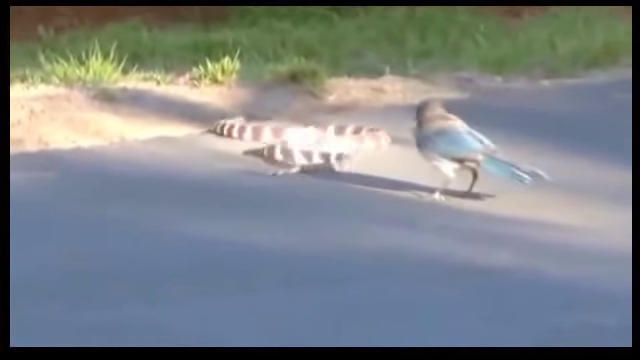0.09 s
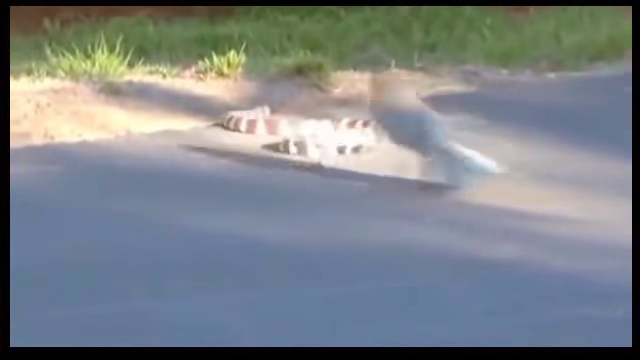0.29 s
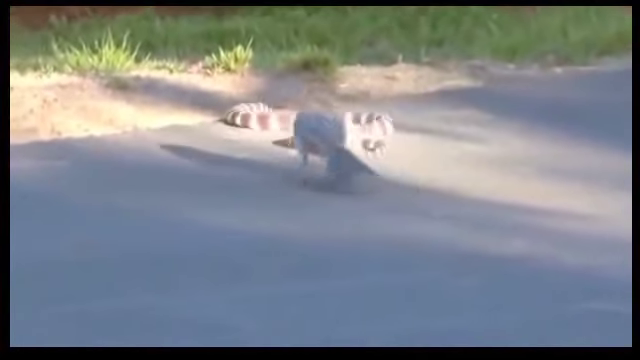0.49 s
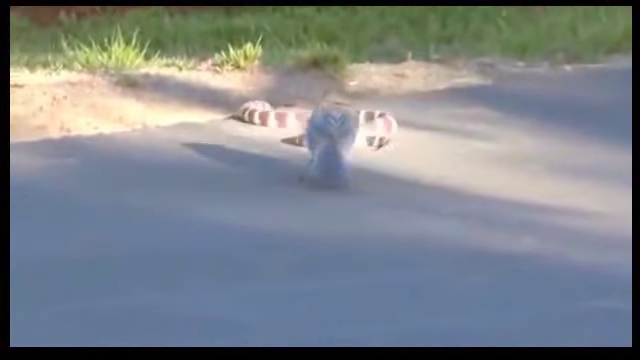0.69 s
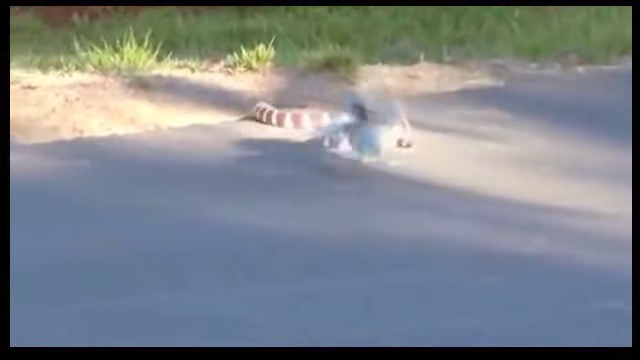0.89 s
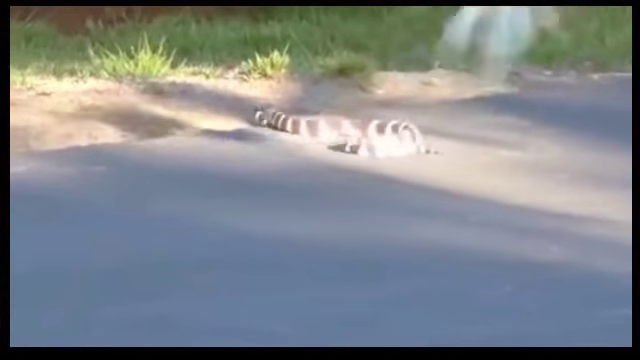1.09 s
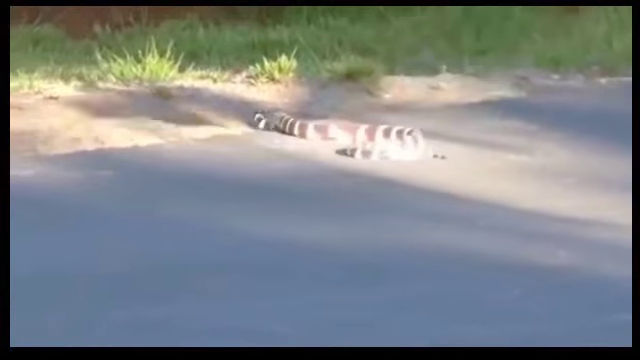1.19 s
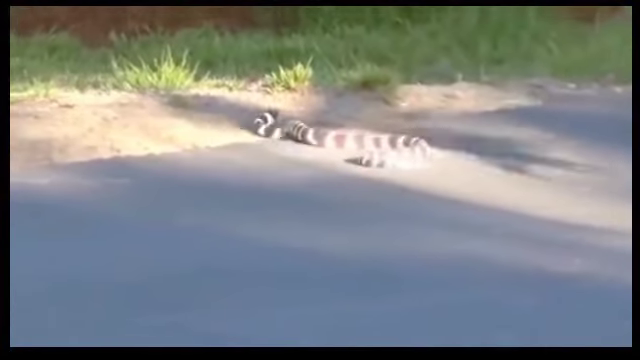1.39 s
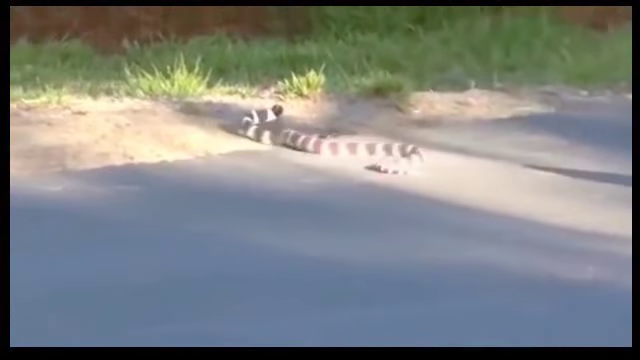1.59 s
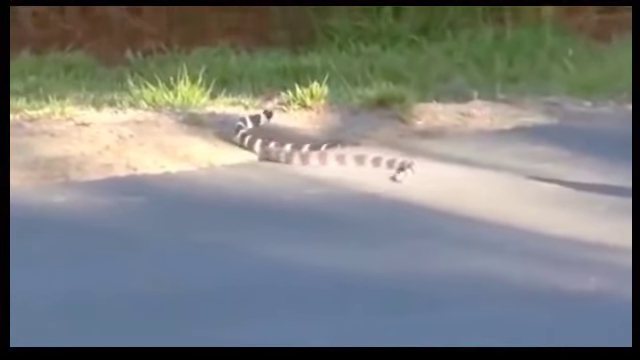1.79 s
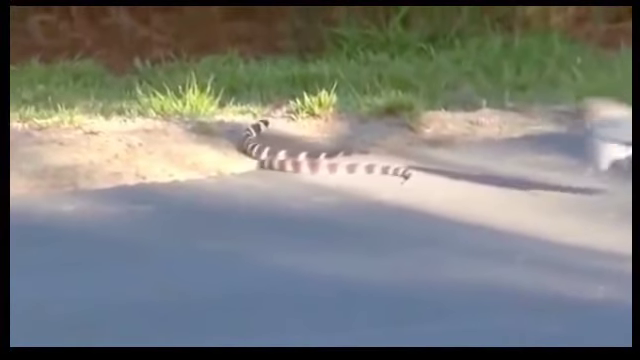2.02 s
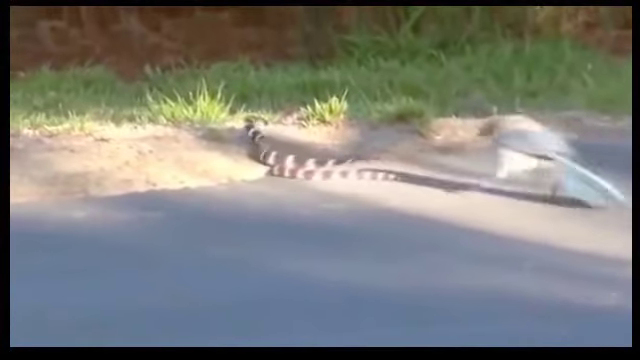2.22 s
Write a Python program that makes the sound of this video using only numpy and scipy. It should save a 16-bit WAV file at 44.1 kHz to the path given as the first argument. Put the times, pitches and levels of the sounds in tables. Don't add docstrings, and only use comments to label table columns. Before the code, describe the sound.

A jay slightly right gives a harsh rising scold near the start and a stronger, shorter one near the end; a sharp loud handling click cuts into the first, over faint roadside hiss on a hand-held camera microphone.

```python
import sys
import numpy as np
from scipy import signal
from scipy.fft import rfft, irfft
from scipy.io import wavfile
from scipy.ndimage import uniform_filter1d

SR = 44100
rng = np.random.default_rng(int(sys.argv[2]) if len(sys.argv) > 2 else 0)


def amplitude_ratio(level_db):
    exponent = np.asarray(level_db, float) / 20
    return 10 ** exponent


def materialize(psi):
    bounded = np.clip(np.atleast_2d(psi).T, -1, 1)
    quanta = np.round(bounded * 32767).astype(np.int16)
    wavfile.write(sys.argv[1], SR, quanta)


N = 99225

# frequency in Hz, level in dB per Hz.
AIR_COLOUR = [(25, -25), (118, -16), (300, -6), (690, 0), (2500, -10), (10000, -23), (11500, -30),
              (14500, -33.5)]
# frequency in Hz, left minus right in dB.
AIR_LEAN = [(60, -17), (110, -12), (200, -10), (380, -6.0), (690, -4.5), (1280, 4), (2350, 5.5), (4330, 5),
            (7990, 3.5), (14700, -16)]
# frequency in Hz, shared power from 0 to 1.
AIR_LIKENESS = [(100, 0.28), (600, 0.13), (3000, 0.48), (7000, .27), (14000, 0.031)]
# middle in seconds, half length in seconds, level in dB.
RUMBLE_SWELLS = [(.01, 0.022, -71), (0.14, 0.07, -61.5), (0.305, 0.036, -65.5), (0.592, 0.07, -63.5),
                 (0.687, 0.039, -60), (0.791, 0.024, -65.5), (1.02, 0.054, -67.5), (1.114, 0.033, -70),
                 (1.673, 0.045, -69), (1.83, .04, -68), (2.05, .04, -77)]
# time in seconds, peak in dB, left minus right in dB, tilt in dB per octave.
BODY_CLICKS = [
    (0.0419, -23, -6, 8.5),
    (0.2243, -4, 2.5, 2),
]
# crack length in seconds, snap delay in seconds, snap level in dB.
CLICK_BREAKS = [
    (.0007, .0022, -3),
    (.0019, .0007, 3),
]
# frequency in Hz, level in dB, 60 dB decay in seconds.
SHELL_MODES = [(1132, 1.5, 0.018), (1767, -4, 0.023), (2097, -4.5, 0.048), (2810, -11, 0.025),
               (3560, -8, 0.011), (4040, 0, 0.0079)]
# frequency in Hz, level in dB.
CRACK_COLOUR = [(500, -14.5), (2000, 8), (4200, 2), (5500, -13), (7000, -6.5), (9500, -21.5),
                (11500, -14.5), (13000, -54)]
# time in seconds, peak in dB, pitch in Hz, cycles, left minus right in dB.
BODY_BUMPS = [(0.097, -52.5, 111, 0.54, -15), (0.123, -57, 100, 0.42, -14), (0.229, -58, 241, 1.6, -14),
              (.667, -43, 265, 0.31, 3), (.6727, -35, 270, .8, -6), (1.014, -57, 210, 1., -6)]
# time in seconds, level in dB, rasp in dB, breath in dB.
CALL_EFFORT = [
    [(.13, -59, -9, -16.5), (.15, -45.5, -7, -13.5), (.19, -40, -5, -7.5), (.25, -41.5, -3, -3.5),
     (.3, -39.5, -16, -7), (.37, -38, -12, -17), (.42, -40.5, -1, -16.5), (.45, -51, -25, -14),
     (.5, -58, -7, -7)],
    [(1.73, -57, -9, -7.5), (1.765, -46, -5, -3.5), (1.83, -40.5, -9, -3), (1.88, -36.5, -19, -5),
     (1.935, -33, -12, -11.5), (1.96, -36.5, -13, -12), (2.0, -40.5, -16, -12), (2.035, -50.5, -12, -14),
     (2.08, -78, -12, -14)],
]
# time in seconds, pitch in Hz, warble as a share of pitch.
CALL_PITCH = [
    [(.13, 420, 0), (.162, 640, 0), (.19, 830, 0), (.215, 930, 0), (.25, 1090, .01), (.3, 1200, .01),
     (.335, 1240, .02), (.355, 1390, .07), (.43, 1460, .035)],
    [(1.73, 420, 0), (1.765, 600, 0), (1.79, 850, 0), (1.812, 910, 0), (1.835, 1060, .01),
     (1.88, 1200, .01), (1.935, 1260, .015), (1.955, 1410, .095), (2.01, 1450, .04)],
]
# frequency in Hz, gain in dB.
THROAT_GAIN = [(1000, -33), (1500, -7), (2300, 3), (2950, -5.5), (3750, 9.5), (4900, -5), (6300, -16),
               (9500, -35)]
# frequency in Hz, level in dB.
BREATH_COLOUR = [(1500, -23.5), (2400, 2), (4000, 0), (5200, -0.5), (7000, -2), (8500, -13), (10000, -41.5),
                 (12500, -30)]
# frequency in Hz, left minus right in dB.
BIRD_LEAN = [(1300, -7), (2350, -6.5), (4300, -4.5), (8000, -4)]
# middle in seconds, half length in seconds, pitch in Hz, level in dB.
WHISTLE_TONES = [
    (.415, 0.048, 3050, -50.5),
    (1.987, 0.033, 3068, -45),
]

TOP_HZ = 14500
MID_HZ = 1250


def along(table, hz):
    table = np.array(table, float)
    return np.interp(np.log(np.maximum(hz, 1)), np.log(table[:, 0]), table[:, 1])


def colour(x, gain):
    return irfft(rfft(x) * gain(np.fft.rfftfreq(N, 1 / SR)), N)


def unit(x):
    return x / np.sqrt(np.mean(x ** 2))


def walk(rate):
    return unit(colour(rng.standard_normal(N), lambda f: np.exp(-(f / rate) ** 2)))


def sides(pan_db):
    return amplitude_ratio(np.array([pan_db / 2, -pan_db / 2]))


def air():
    level_db, swell_db, flicker_db = -57, .4, .9
    common, left, right = rng.standard_normal((3, N))

    def alike(f):
        return np.clip(along(AIR_LIKENESS, f), 0, 1)

    shared = colour(common, lambda f: np.sqrt(alike(f)))
    pair = np.array([shared + colour(own, lambda f: np.sqrt(1 - alike(f))) for own in (left, right)])
    pair = colour(pair, lambda f: amplitude_ratio(along(AIR_COLOUR, f)) * sides(along(AIR_LEAN, f)) * (f > 18))
    swell, out = walk(4.5), 0
    for octave in np.arange(4, 14.6, .5):
        band = colour(pair, lambda f: np.clip(1 - 2 * np.abs(np.log2(f + 1) - octave), 0, 1))
        out = out + band * amplitude_ratio(swell_db * swell + flicker_db * walk(4.1))
    return out * amplitude_ratio(level_db) / np.sqrt(np.mean(out.mean(axis=0) ** 2))


def rumble(t):
    centre_hz, width, pan_db = 82, 0.76, -12.5
    noise = rng.standard_normal((2, N))
    low = colour(noise, lambda f: np.exp(-(np.log((f + 1) / centre_hz) / width) ** 2))
    swell = sum(amplitude_ratio(db) * np.exp(-((t - at) / half) ** 2) for at, half, db in RUMBLE_SWELLS)
    return unit(low) * swell * sides(pan_db)[:, None]


def clicks(t):
    snap_hz, snap_s, rattle_s = 2340, 0.00055, 0.0011
    rattle_db, crack_db, tail_db = -5.5, -5, -23
    tail_t60_s, tail_hz, tilt_pivot_hz = 0.091, 1630, 2800
    out = np.zeros((2, N))
    hz, db, t60 = np.array(SHELL_MODES).T[:, :, None]
    for (at, peak_db, pan_db, tilt_db), (crack_s, late_s, snap_db) in zip(BODY_CLICKS, CLICK_BREAKS):
        since = np.maximum(t - at, 0)
        snap = np.exp(-((t - at - late_s) / snap_s) ** 2) * np.sin(2 * np.pi * snap_hz * (t - at))
        hiss = colour(rng.standard_normal((2, N)), lambda f: 1 / (1 + ((f - tail_hz) / 900) ** 2))

        def crack_gain(f):
            return amplitude_ratio(along(CRACK_COLOUR, f) + tilt_db * np.log2((f + 1) / tilt_pivot_hz))

        crack = unit(colour(rng.standard_normal((2, N)), crack_gain))
        crack = crack * amplitude_ratio(crack_db) * np.exp(-((t - at - crack_s) / crack_s) ** 2)
        rise = 1 - np.exp(-(since / rattle_s) ** 2)
        for ch in range(2):
            turn = rng.uniform(0, 2 * np.pi, hz.shape)
            ring_db = db + tilt_db * np.log2(hz / tilt_pivot_hz) - 60 * since / t60
            ring = amplitude_ratio(ring_db) * np.sin(2 * np.pi * hz * since + turn)
            tail = unit(hiss[ch]) * amplitude_ratio(tail_db - 60 * since / tail_t60_s)
            hit = rise * (amplitude_ratio(rattle_db) * ring.sum(axis=0) + tail + crack[ch])
            hit = hit + amplitude_ratio(snap_db - 17.5 * ch) * snap
            out[ch] += hit * amplitude_ratio(peak_db) * sides(pan_db)[ch]
    return out


def bumps(t):
    out = 0
    for at, db, hz, cycles, pan_db in BODY_BUMPS:
        thud = np.exp(-((t - at) * hz / cycles) ** 2) * np.cos(2 * np.pi * hz * (t - at))
        out = out - amplitude_ratio(db) * sides(pan_db)[:, None] * thud
    return out


def read_calls(calls, t):
    rows = np.vstack(calls)
    return [np.interp(t, rows[:, 0], column) for column in rows.T[1:]]


def jay(t):
    glide_hz, warble = read_calls(CALL_PITCH, t)
    db, rasp_db, breath_db = read_calls(CALL_EFFORT, t)
    fade_s = .012
    sounding = sum(np.clip(np.minimum(t - call[0][0], call[-1][0] - t) / fade_s, 0, 1)
                   for call in CALL_EFFORT)

    onset = np.clip(1 - glide_hz / MID_HZ, 0, 1)
    swing = np.sin(2 * np.pi * np.cumsum(76.46 * (1 + 0.0812 * walk(17.95))) / SR)
    hz = glide_hz * (1 + warble * swing + (.012 + .03 * onset) * walk(112))
    phase = 2 * np.pi * np.cumsum(hz) / SR
    fray = amplitude_ratio(rasp_db + 9 * onset)

    gape = np.maximum(glide_hz / MID_HZ, 1) ** .6
    lift_db = 24.5 * np.log2(glide_hz / MID_HZ)
    voice, power = 0, 0
    for k in range(1, 19):
        bright_db = lift_db * np.clip(np.log2(k * hz / 2900), -.25, .6)
        gain = amplitude_ratio(along(THROAT_GAIN, k * hz / gape) + bright_db) * (k * hz < TOP_HZ)
        rasp = (1 + fray * walk(300)) / np.sqrt(1 + fray ** 2)
        voice = voice + gain * rasp * np.sin(k * phase + (k - 1) ** 2)
        power = power + gain ** 2 / 2
    voice = voice / np.sqrt(uniform_filter1d(power, size=900))

    breath = unit(colour(rng.standard_normal(N), lambda f: amplitude_ratio(along(BREATH_COLOUR, f))))
    low = colour(breath, lambda f: 1 / (1 + (f / 5500) ** 8))
    breath = low * amplitude_ratio(2.5 * walk(50)) + (breath - low) * amplitude_ratio(1.5 * walk(40))
    flutter = np.sin(2 * np.pi * np.cumsum(148.4 * (1 + 0.247 * walk(26.2))) / SR)
    return (voice * amplitude_ratio(1.5 * flutter) + breath * amplitude_ratio(breath_db)) * amplitude_ratio(db) * sounding


def echo(x):
    level_db, t60_s, gap_s = -6, .36, .006
    s = np.arange(SR // 2) / SR
    tail = rng.standard_normal((2, len(s))) * amplitude_ratio(-60 * s / t60_s) * (s > gap_s)
    tail = tail / np.sqrt(np.sum(tail ** 2, axis=1, keepdims=True))
    return amplitude_ratio(level_db) * signal.fftconvolve(x[None], tail, axes=1)[:, :N]


def whistle(t):
    octave_db, rise_hz_per_s = -11.5, 1200
    out = 0
    for at, half, hz, db in WHISTLE_TONES:
        pitch_hz = hz * (1 + .006 * walk(80)) + rise_hz_per_s * np.minimum(t - at, 0)
        phase = 2 * np.pi * np.cumsum(pitch_hz) / SR
        tone = np.sin(phase) + amplitude_ratio(octave_db) * np.sin(2 * phase)
        out = out + tone * amplitude_ratio(db + 4.2 * walk(70)) * np.exp(-((t - at) / half) ** 2)
    return out


def scene():
    t = np.arange(N) / SR
    bird = jay(t) + whistle(t)
    heard = colour(bird + echo(bird), lambda f: sides(along(BIRD_LEAN, f)))
    return air() + rumble(t) + clicks(t) + bumps(t) + heard


def top_cut(x):
    return signal.sosfilt(signal.butter(12, 15320, fs=SR, output="sos"), x)


def record(dry):
    low_pass = signal.ellip(8, .2, 70, TOP_HZ, fs=SR, output="sos")
    cut = signal.sosfilt(low_pass, np.clip(dry, -1, 1))
    return top_cut(cut)


dry = scene()
out = record(dry)
materialize(out)
```